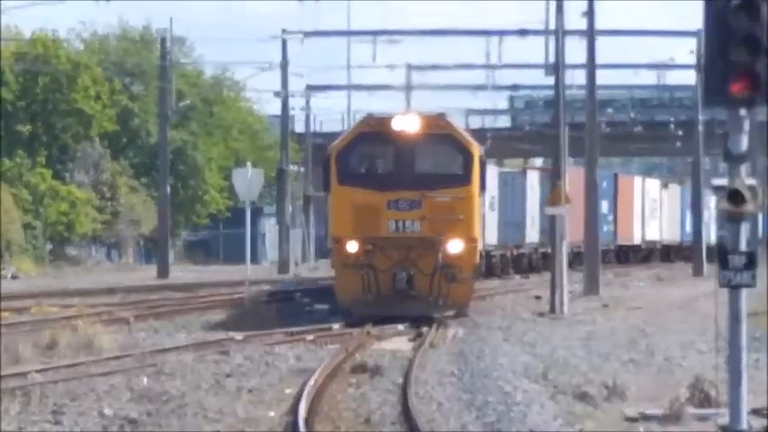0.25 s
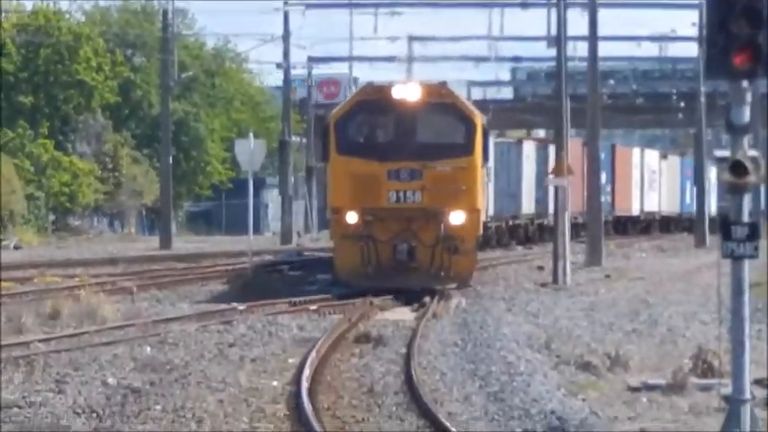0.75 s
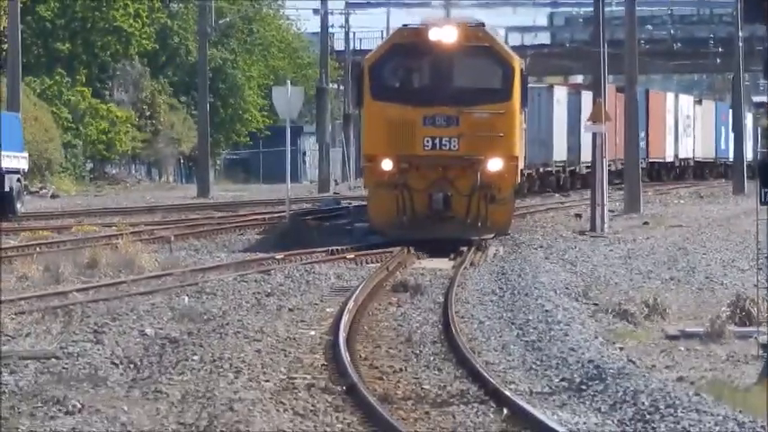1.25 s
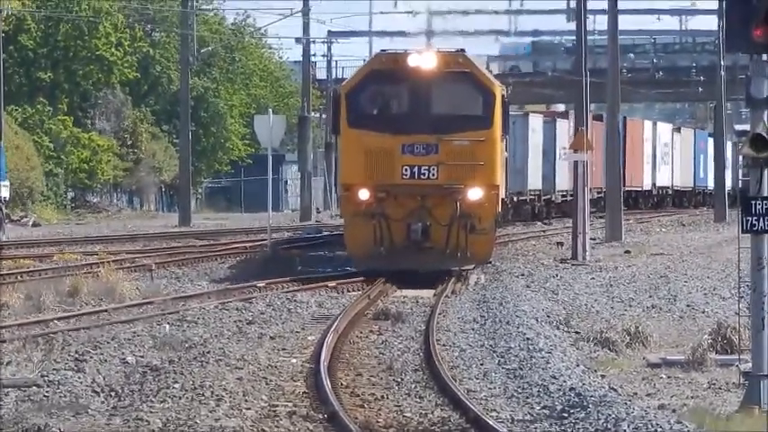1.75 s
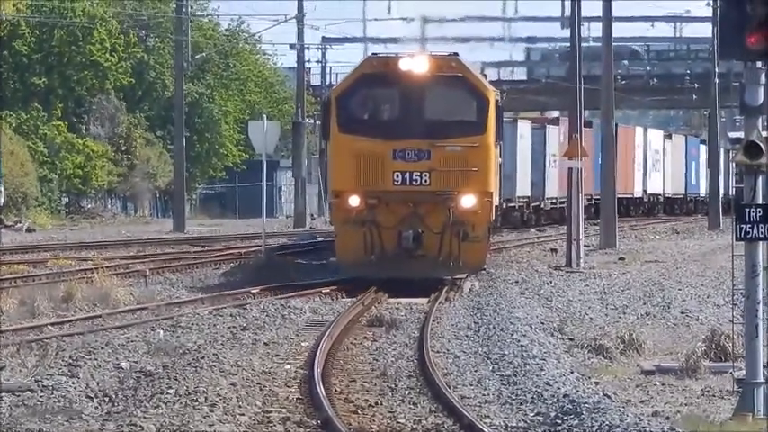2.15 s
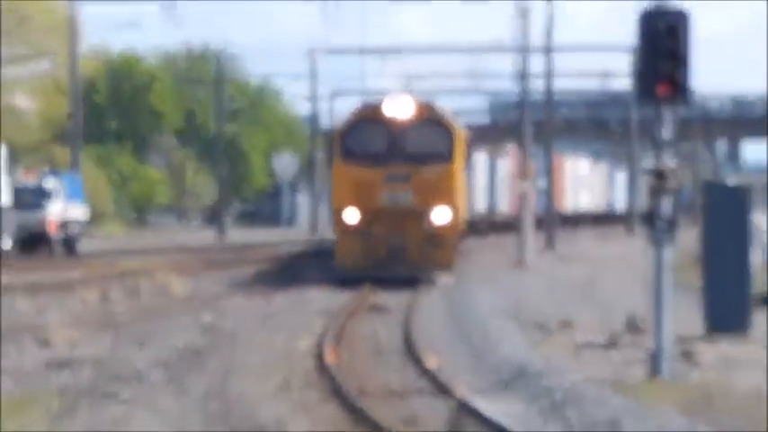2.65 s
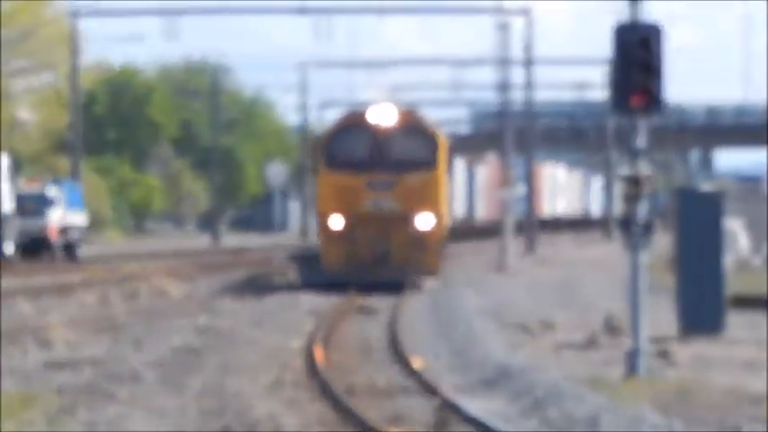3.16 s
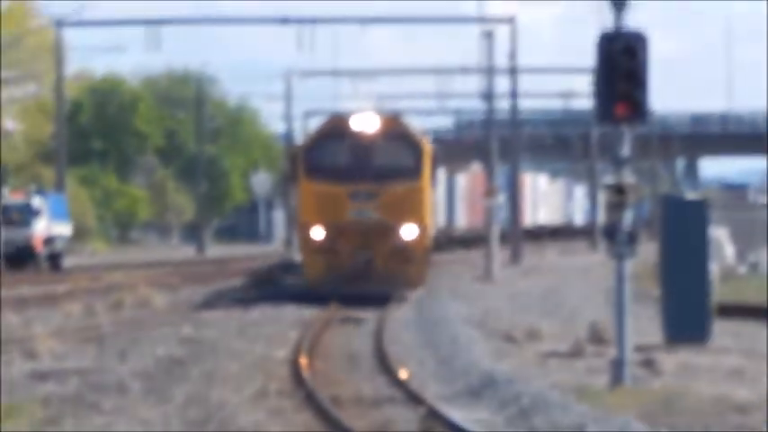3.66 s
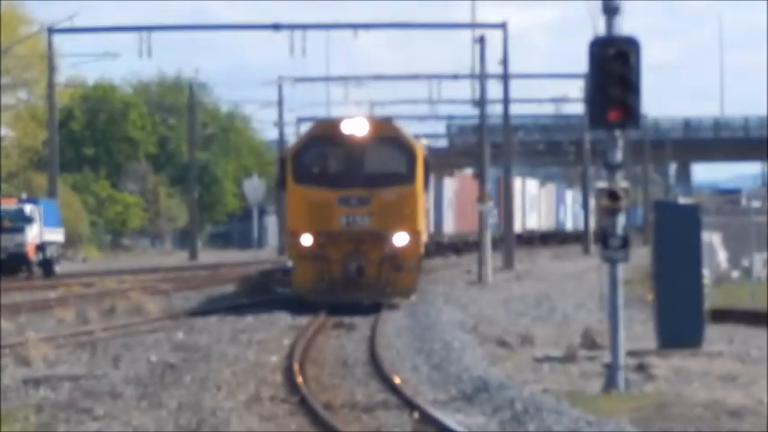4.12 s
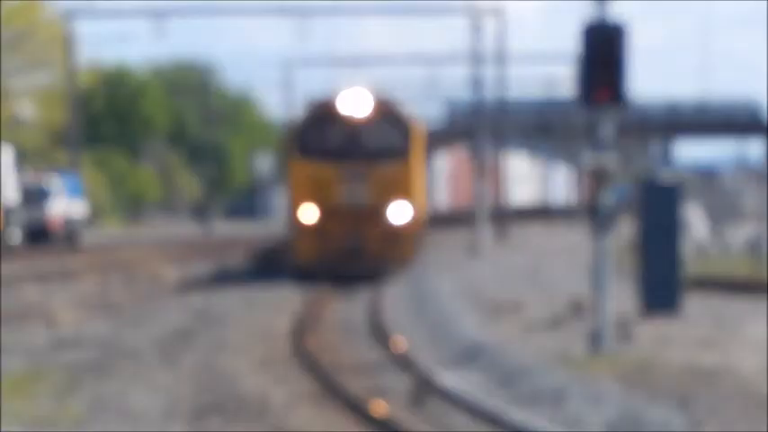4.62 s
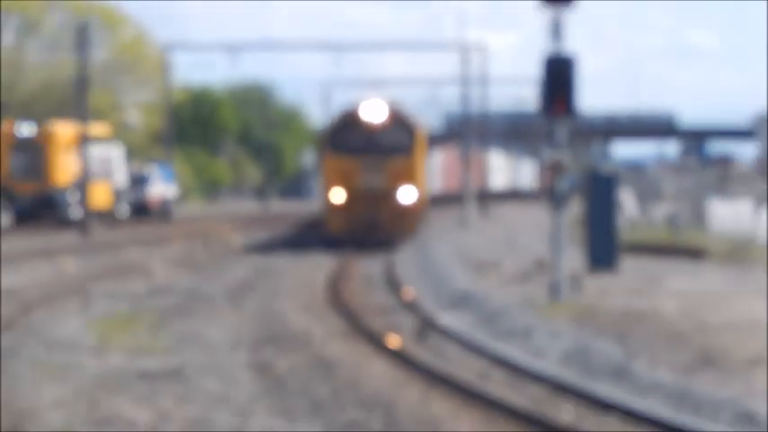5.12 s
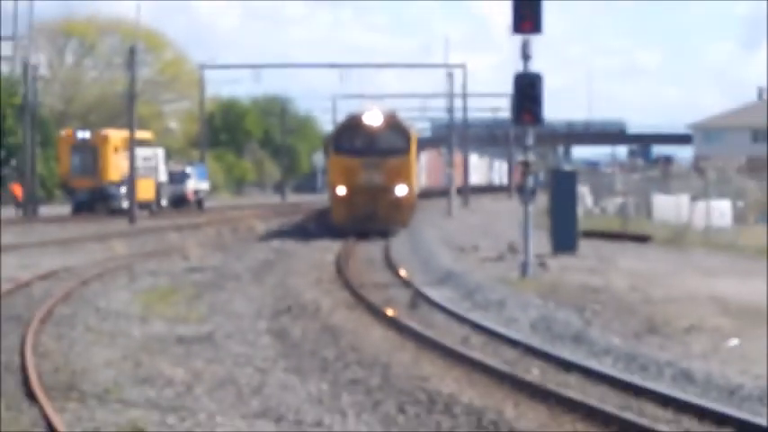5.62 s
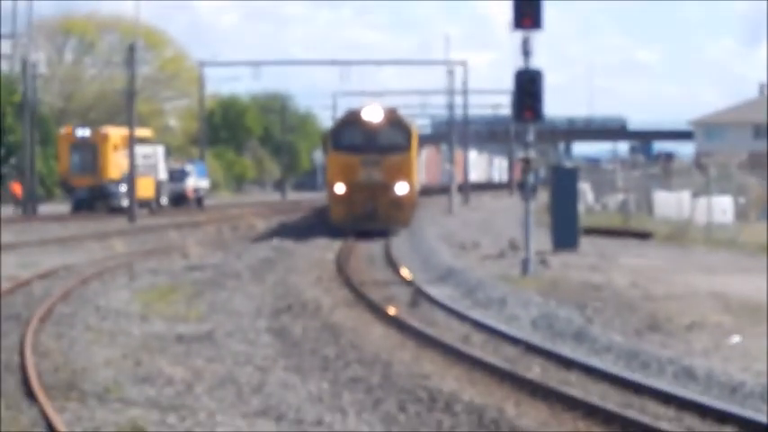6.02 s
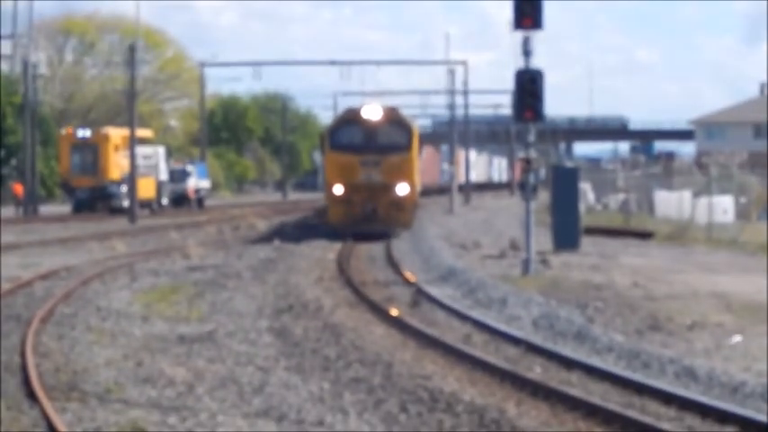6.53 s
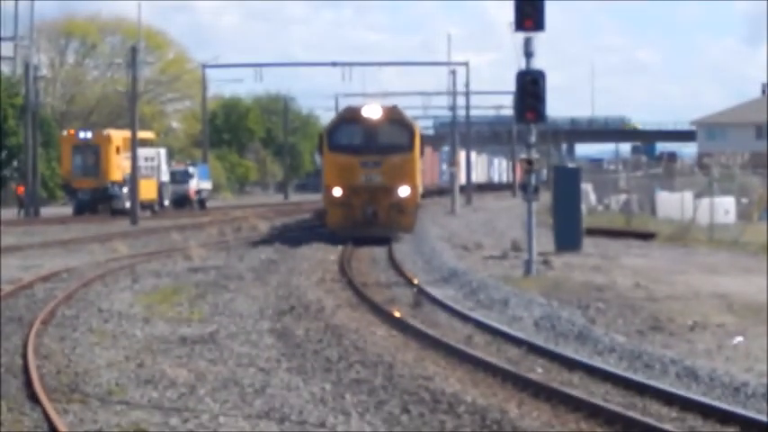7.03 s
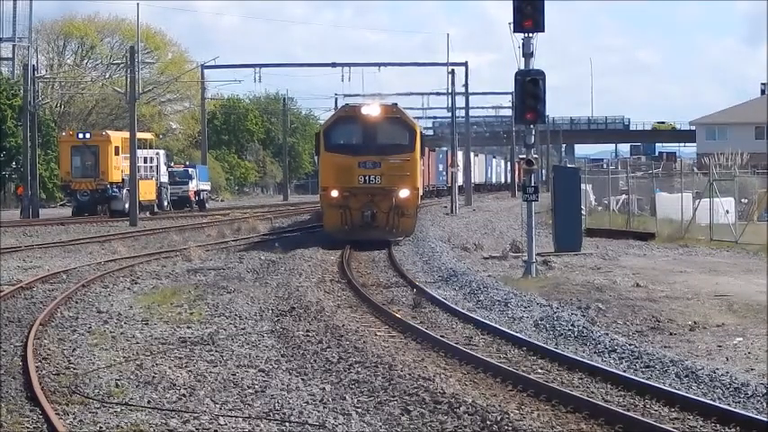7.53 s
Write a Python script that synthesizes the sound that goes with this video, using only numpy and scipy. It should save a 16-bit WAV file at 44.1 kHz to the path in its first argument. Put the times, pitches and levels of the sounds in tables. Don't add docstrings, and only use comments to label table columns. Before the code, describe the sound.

A diesel freight train throbs and rumbles closer outdoors, its low engine tone pulsing over rolling roar while a handheld camera's zoom lever clicks.

```python
import sys
import numpy as np
from scipy import signal
from scipy.fft import rfft, irfft, next_fast_len
from scipy.io import wavfile
from scipy.ndimage import uniform_filter1d, map_coordinates

SR = 44100
rng = np.random.default_rng(int(sys.argv[2]) if len(sys.argv) > 2 else 0)


def wrap_up_sound(samples):
    columns = np.atleast_2d(samples).T
    tamed = np.clip(columns, -1, 1)
    steps = np.round(tamed * 32767).astype(np.int16)
    wavfile.write(sys.argv[1], SR, steps)


def field_ratio(decibels):
    return 10 ** (np.asarray(decibels, dtype=float) / 20)


N = 343098

# (frequency [Hz], width [Hz], level [dB])
LEVER_MODES = [(4800, 1100, -2), (6300, 1100, -2), (8200, 900, -3), (10300, 800, -2), (12400, 1800, -9)]
# (frequency [Hz], width [Hz], level [dB])
SHELL_MODES = [(600, 600, -4), (1300, 700, -6), (2200, 800, -5), (3600, 1200, -5)]


def unit(x):
    return x / np.sqrt(np.mean(x ** 2) + 1e-20)


def along(points, hz, column=1):
    table = np.transpose(points)
    return np.interp(np.log(hz + 1), np.log(table[0] + 1), table[column])


def curves(rows):
    s, *cols = np.transpose(rows)
    return [np.interp(np.arange(N) / SR, s, c) for c in cols]


def wobble(rate):
    knots = rng.standard_normal(int(N * rate / SR) + 4)
    return map_coordinates(knots, [np.arange(N) * rate / SR])


def swell(s, half, db):
    return field_ratio(db) * np.exp(-((np.arange(N) / SR - s) / half) ** 2)


def gate(start, end, ramp_s):
    clock = np.arange(N) / SR
    return np.clip(np.minimum(clock - start, end - clock) / ramp_s, 0, 1)


def filtered(x, response):
    m = next_fast_len(x.shape[-1] + 8192)
    return irfft(rfft(x, m) * response(np.fft.rfftfreq(m, 1 / SR)), m)[..., :x.shape[-1]]


def resonances(modes):
    def response(f):
        total = 0
        for k, (center, width, db) in enumerate(modes):
            damping = 1j * f * width
            total = total + (-1) ** k * field_ratio(db) * damping / (center ** 2 - f ** 2 + damping)
        return total
    return response


def dull(f, top_hz):
    return 1 / (1 + 1.3j * f / top_hz - (f / top_hz) ** 2) ** 2


def rush(spectrum, patchy_db):
    z = signal.stft(rng.standard_normal((2, N)), nperseg=512)[2]
    field = uniform_filter1d(rng.standard_normal(z.shape[1:]), size=5, axis=0)
    field = uniform_filter1d(field, size=12, axis=1)
    pair = signal.istft(z * field_ratio(patchy_db * unit(field)), nperseg=512)[1][:, :N]
    return unit(filtered(pair, lambda hz: field_ratio(along(spectrum, hz))))


def shaft():
    # (time [s], shaft rate [turns/s])
    speed = [
        (0, 14.45),
        (1, 15.05),
        (2, 15.8),
        (3, 16.55),
        (4, 17.05),
        (4.8, 17.05),
        (5.6, 16.87),
        (7.78, 16.9),
    ]
    return 2 * np.pi * np.cumsum(curves(speed)[0]) / SR


def faded(order, turn, ends_db, fades):
    clock = np.arange(N) / SR
    gain = field_ratio(np.linspace(*ends_db, N))
    angle = order * shaft() + 2 * np.pi * turn
    for s, fall, recovery, depth_db, slip in fades:
        away = np.tanh((clock - s) / np.where(clock < s, fall, recovery))
        gain = gain * np.sqrt(away ** 2 + (1 - away ** 2) * field_ratio(2 * depth_db))
        angle = angle + np.pi * slip * (1 + np.tanh((clock - s) / .08))
    return gain * np.sin(angle)


def firing():
    # (time [s], fall [s], recovery [s], depth [dB], slip
    fourth_fades = [
        (.1, 0.67, 1.2, -22.5, 0.017),
        (1.8, 0.68, .15, -12.5, 0),
        (2, 0.59, 0.71, -7, 0.039),
        (3.3, 0.33, 0.3, -10, .18),
        (6.42, 0.75, 0.29, -17, .32),
        (6.9, .3, .25, -6, 0.072),
    ]
    fifth_fades = [(0, .1, 0.17, -13, 0.041), (.3, .4, 0.31, -6, -0.062), (1, .5, 0.24, -5, -0.045),
                   (1.3, .12, 0.11, -11, 0.032), (1.58, .25, 0.35, -10.5, -0.052),
                   (1.87, 0.3, 0.16, -4.5, 0.026), (2.6, .3, .3, -9.5, 0.03), (3, 0.27, 0.33, -8.5, 0.026),
                   (4.35, 0.29, 0.098, -15, -0.5), (4.45, 0.83, 1.1, -12, -0.055),
                   (6.85, 0.63, 0.65, -20, 0.25)]
    # (shaft order, level [dB])
    faint = [(7, -43.5), (8, -52), (10, -52.5), (11, -60), (12, -57), (13, -46.5), (14, -49.5), (15, -48.5),
             (16, -48.5), (17, -52), (19, -53), (20, -50.5), (24, -53.5)]
    # (time [s], shaft order, half length [s], level [dB])
    swells = [(0.299, 13, 0.43, -45.5), (1.331, 13, 0.066, -33.5), (2.397, 13, 0.35, -37.5),
              (3.895, 8, 0.35, -41.5), (4.2, 13, 0.28, -44), (4.3, 11, 0.47, -39.5),
              (4.488, 16, 0.24, -43.5), (4.606, 12, 0.25, -36), (5.4, 12, 0.23, -43),
              (5.398, 13, 0.14, -37.5), (5.498, 8, 0.48, -38), (5.803, 11, .28, -33),
              (6.049, 8, 0.22, -37.5), (6.1, 13, 0.15, -37.5), (6.401, 12, .3, -32.5),
              (6.5, 10, .25, -39.5), (7.044, 8, .3, -41), (7.147, 12, 0.24, -29), (7.15, 20, .22, -40),
              (7.5, 11, 0.17, -37)]
    tone = faded(order=4, turn=.3, ends_db=(-25, -20.5), fades=fourth_fades)
    tone += faded(order=5, turn=-.04, ends_db=(-12.5, -11.5), fades=fifth_fades)
    crank = shaft()
    nearing_db = np.linspace(-5, 2.5, N)
    for order, db in faint:
        size = field_ratio(db + nearing_db + 3.5 * wobble(3))
        size += sum(swell(s, half, top_db) for s, which, half, top_db in swells if which == order)
        tone += size * field_ratio(1.1 * wobble(15)) * np.sin(order * crank + 0.96 * wobble(6))
    return np.sqrt(2) * tone


def exhaust(load_db, surge):
    # (frequency [Hz], level per Hz [dB])
    exhaust_spectrum = [(250, -19), (420, -4.5), (475, -6.5), (667, -2.5), (719, -3), (987, -7.5),
                        (1310, -3.5), (1430, -10.5), (1700, -21), (2210, -38), (3740, -120)]
    level_db = -37 + 0.92 * load_db + 0.82 * surge + 0.36 * np.sin(shaft())
    return field_ratio(level_db) * rush(exhaust_spectrum, patchy_db=0.17)


def rumble(load_db, surge):
    # (frequency [Hz], level per Hz [dB])
    rumble_spectrum = [(15, -55), (25, -39.5), (51, -14.5), (86, -3.5), (110, -14.5), (134, -13),
                       (166, -9.5), (215, -8), (260, -14.5), (330, -46), (700, -120)]
    return field_ratio(-33.5 + 1.25 * load_db + 0.72 * surge) * rush(rumble_spectrum, patchy_db=-0.94)


def wagons(load_db):
    # (frequency [Hz], level per Hz [dB])
    wagon_spectrum = [(120, -120), (220, -15.5), (270, 1.5), (340, -0.5), (380, -7.5), (450, -11),
                      (520, -30), (1000, -120)]
    # (time [s], half length [s], level [dB])
    booms = [
        (1.45, 0.045, -46),
        (2.703, 0.12, -44),
        (3.1, 0.23, -40.5),
        (4.15, 0.37, -40),
        (4.57, 0.053, -46),
        (5.96, 0.042, -43.5),
        (7.13, 0.19, -40.5),
        (7.65, 0.33, -38),
    ]
    drone = field_ratio(-41 + load_db + 0.92 * wobble(5.2))
    return (drone + sum(swell(*row) for row in booms)) * rush(wagon_spectrum, patchy_db=0.0)


def wheels(near_db, surge):
    # (frequency [Hz], level per Hz [dB])
    wheel_spectrum = [(900, -36.5), (1500, -4.5), (2100, -2.5), (2300, -7.5), (2700, -10.5), (3100, -11),
                      (3300, -17), (3600, -14), (3850, -22.5), (4300, -36), (7000, -120)]
    level_db = -42 + near_db + 0.67 * surge + 0.41 * wobble(40)
    return field_ratio(level_db) * rush(wheel_spectrum, patchy_db=0.73)


def far_hiss(near_db):
    # (frequency [Hz], level per Hz [dB])
    hiss_spectrum = [(2500, -120), (3500, -24), (4000, 1), (4700, 0), (5500, -3.5), (7000, -9),
                     (9600, -16.5), (14000, -28.5), (15800, -33.5)]
    hiss_db = -58 + 0.79 * near_db + 2 * np.linspace(-1, 1, N)
    return field_ratio(hiss_db + 0.28 * wobble(30)) * rush(hiss_spectrum, patchy_db=1.0)


def roar():
    # (time [s], engine load [dB], wheel nearness [dB])
    approach = [
        (0, -5, -1.5),
        (.5, -2, -2.5),
        (1.7, -2.5, -2),
        (2.4, -2, 2.5),
        (3.3, 0, 0.5),
        (4.5, 0, 0),
        (5.5, 0.5, .5),
        (6.2, .5, 1),
        (7.1, -1, .5),
        (7.78, 1.5, 0.5),
    ]
    load_db, near_db = curves(approach)
    surge = wobble(3.056)
    low = rumble(load_db, surge) + wagons(load_db)
    return low + exhaust(load_db, surge) + wheels(near_db, surge) + far_hiss(near_db)


def squeals():
    # (start [s], end [s], frequency [Hz], width [Hz], level [dB])
    squeal_table = [
        (6.362, 6.45, 9300, 12, -65),
        (6.362, 6.43, 9000, 650, -60),
        (6.36, 6.44, 12500, 400, -69),
        (6.36, 6.4, 14500, 900, -71),
        (6.625, 6.73, 8430, 6, -64),
        (6.57, 6.63, 7260, 30, -70),
        (6.6, 6.63, 6500, 60, -63),
        (1.25, 1.29, 6900, 150, -72),
    ]
    out = np.zeros((2, N))
    for start, end, hz, width, db in squeal_table:
        t = np.linspace(0, 1, round((end - start) * SR))
        noise = rng.standard_normal((2, N // 8))
        band = filtered(noise, lambda f: np.exp(-((f - hz) / width) ** 2))
        envelope = field_ratio(db - 9 * t ** 2) * np.clip(30 * t, 0, 1)
        out[:, round(start * SR):][:, :len(t)] += envelope * unit(band[:, :len(t)])
    return out


def lever_ticks():
    # (time [s], tick level [dB], tick frequency [Hz], knock level over tick [dB])
    ticks = [(0.1269, -41.5, 9900, 7.5), (0.166, -38, 7900, 6), (0.173, -46.5, 7600, 22),
             (2.145, -31.5, 7970, -8), (2.1506, -32.5, 9780, -2.5), (2.2509, -31.5, 5440, -5),
             (2.2886, -36.5, 6450, 10), (2.2992, -39, 5500, 18.5), (2.886, -37, 6500, 2),
             (2.9277, -31.5, 6060, 1.5), (2.9297, -46.5, 5030, 22), (4.259, -34.5, 4250, 4.5),
             (4.2608, -41, 4480, 8), (4.6082, -40.5, 5205, 9), (4.6436, -35, 6600, 8.5),
             (4.649, -35, 5850, 12), (4.657, -41, 12200, 9.5), (5.0168, -49, 6900, -12),
             (5.046, -44, 9600, -15), (5.0818, -30.5, 8250, -21), (5.728, -48, 7000, -7),
             (5.761, -58, 5640, 7), (5.777, -54, 5560, 6), (6.8701, -51.5, 8840, -5),
             (6.951, -48.5, 9700, -5)]
    out = np.zeros((2, N))
    t = np.arange(SR // 30) / SR
    for s, db, tick_hz, knock_db in ticks:
        knock_hz = 3600 - 212 * max(knock_db - 7.5, 0)
        burst = rng.standard_normal((2, 2, len(t))) * (1 - np.exp(-t / .0004))
        burst = .8 * burst[:, :1] + .6 * burst
        modes = [(hz, width, level + rng.normal(0, 2)) for hz, width, level in LEVER_MODES]
        tick_response = resonances(modes + [(tick_hz, 700, 5)])
        knock_response = resonances(SHELL_MODES + [(knock_hz, 1200, 1.5)])
        tick = filtered(burst[0] * field_ratio(-60 * t / .008), lambda f: tick_response(f) * dull(f, 14000))
        knock = filtered(burst[1] * field_ratio(-60 * t / .014),
                         lambda f: knock_response(f) * dull(f, knock_hz + 1800))
        both = tick / abs(tick.mean(0)).max()
        both = both + field_ratio(knock_db + 2.5) * knock / abs(knock.mean(0)).max()
        out[:, round(s * SR):][:, :len(t)] += field_ratio(db) * both
    return out


def lever_rubs():
    # (start [s], end [s], level [dB])
    rubs = [(.128, .182, -55), (.91, .93, -66), (1, 1.02, -65), (1.905, 1.935, -64), (2.125, 2.158, -56),
            (2.252, 2.315, -60), (2.887, 2.945, -58), (4.236, 4.27, -59), (4.61, 4.69, -57),
            (5.03, 5.06, -62), (5.727, 5.805, -58)]
    grit = rng.standard_normal((2, N)) * field_ratio(2.5 * wobble(500))
    body = resonances(SHELL_MODES + LEVER_MODES)
    grit = unit(filtered(grit, lambda f: body(f) * dull(f, 8500)))
    return sum(field_ratio(db) * gate(start, end, .0059) for start, end, db in rubs) * grit


def lens_buzz():
    steps = np.zeros(N)
    beats = np.arange(.025, .122, 1 / 189)
    steps[(beats * SR).astype(int)] = field_ratio(-34 + rng.normal(0, 3, len(beats)))
    return filtered(steps, resonances([(6200, 1200, 0), (7900, 900, 0.021)]))


def lens():
    # (frequency [Hz], level per Hz [dB])
    motor_spectrum = [(5000, -120), (7000, -16), (9000, -2), (10500, -0.5), (11500, -5), (12500, -8),
                      (14000, -10), (15800, -17)]
    # (start [s], end [s], level [dB])
    runs = [
        (0, .3, -74.5),
        (2.3, 2.903, -67),
        (3.5, 4.2, -79.5),
        (4.62, 5.1, -68),
        (5.2, 5.9, -73),
        (6.3, 6.9, -73),
        (7.3, 7.9, -73.5),
    ]
    clock = np.arange(N) / SR
    level = field_ratio(-82)
    for start, end, db in runs:
        settling_db = 10.5 * np.clip((clock - start) / (end - start), 0, 1)
        level = level + field_ratio(db - settling_db) * gate(start, end, .03)
    return level * field_ratio(1.2 * wobble(50)) * rush(motor_spectrum, patchy_db=1.0) + lens_buzz()


def ports(pair):
    # (frequency [Hz], likeness [0-1], left lag [radians], left over right [dB])
    port_table = [(90, .9995, .025, 0), (250, .985, .15, 0), (570, .96, .38, 0), (1000, .72, .85, -1),
                  (1550, .55, 1.2, -2.2), (2100, .38, 1.2, -3.2), (3300, .33, 2.4, -3),
                  (4500, .36, 3.1, -1.6), (7500, .33, 5.8, 0), (11000, .3, 9.3, 0)]

    def mixture(hz):
        turn = np.arccos(np.clip(along(port_table, hz), 0, 1)) / 2
        return np.array([np.cos(turn), np.sin(turn)])

    def left_right(hz):
        level = field_ratio(along(port_table, hz, column=3) / 2)
        left = level * np.exp(-.5j * along(port_table, hz, column=2))
        return np.array([left, 1 / left])

    direct, diffuse = filtered(pair, mixture)
    return filtered(np.array([direct + diffuse, direct - diffuse]), left_right)


def scene():
    air = roar() + squeals() + lens()
    air[0] += firing()
    return ports(air) + lever_ticks() + lever_rubs()


def top_cut(x):
    return signal.sosfilt(signal.butter(12, 15830, fs=SR, output="sos"), x)


def record(dry):
    # (frequency [Hz], width [Hz], depth [0-1])
    notch_table = [(2500, 60, .86), (4005, 70, .4), (5000, 75, .78), (7500, 80, .76), (10000, 80, .7)]

    def notches(f):
        gain = 1
        for hz, width, depth in notch_table:
            gain = gain * (1 - depth / (1 + ((f - hz) / (width / 2)) ** 2))
        return gain

    mix = filtered(dry, notches)
    return top_cut(mix)


dry = scene()
out = record(dry)
wrap_up_sound(out)
```